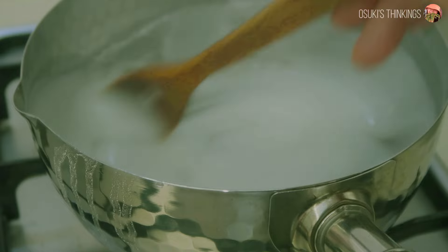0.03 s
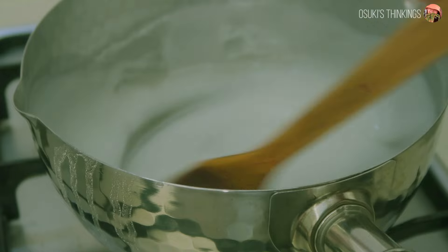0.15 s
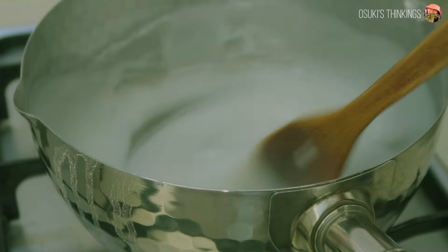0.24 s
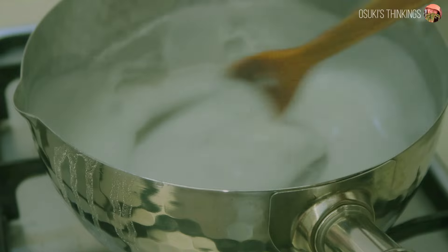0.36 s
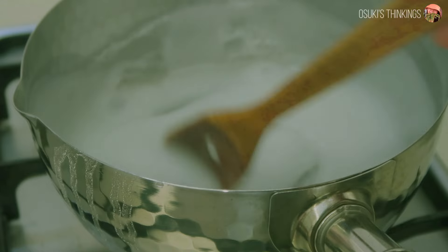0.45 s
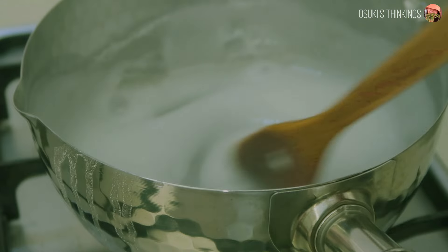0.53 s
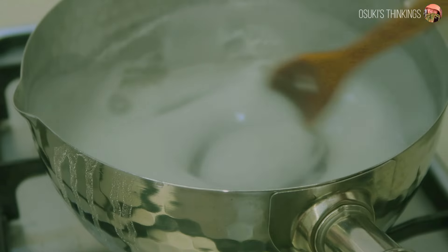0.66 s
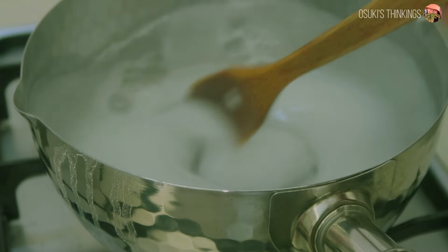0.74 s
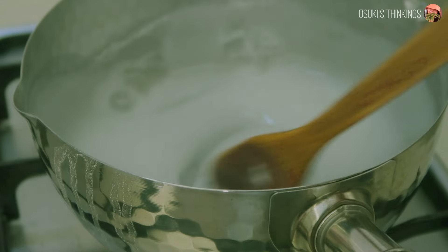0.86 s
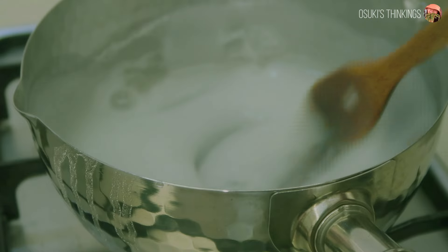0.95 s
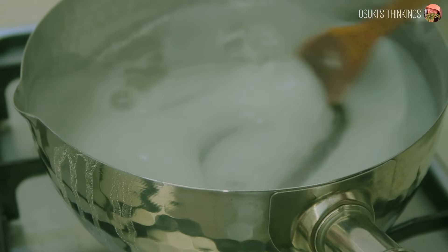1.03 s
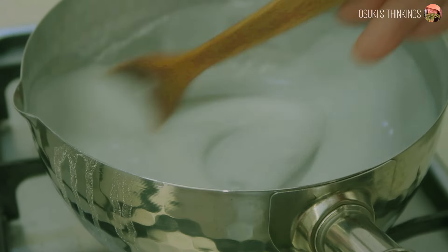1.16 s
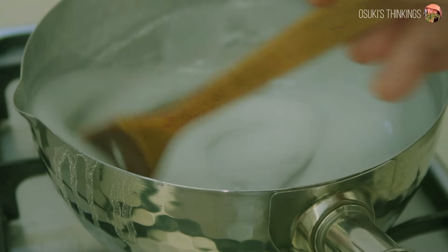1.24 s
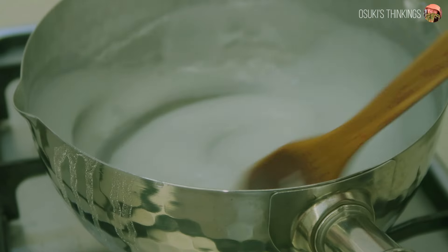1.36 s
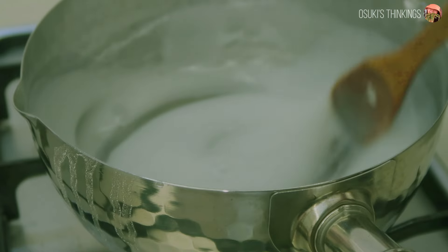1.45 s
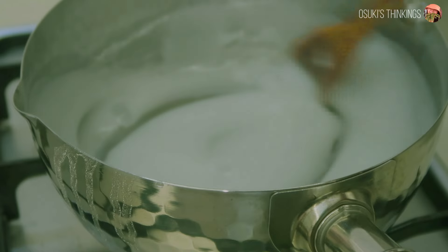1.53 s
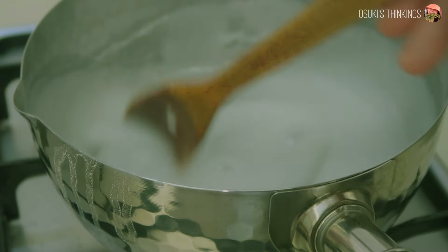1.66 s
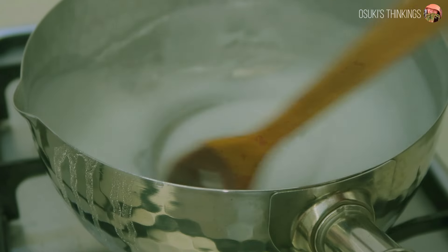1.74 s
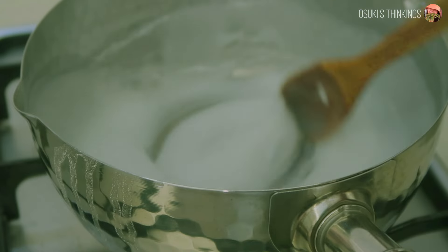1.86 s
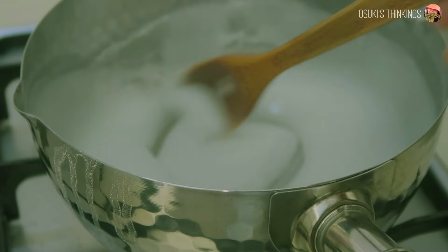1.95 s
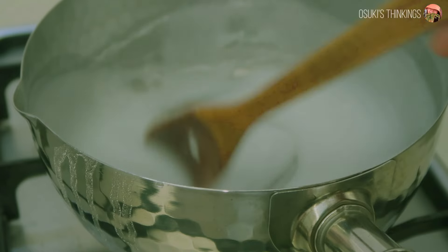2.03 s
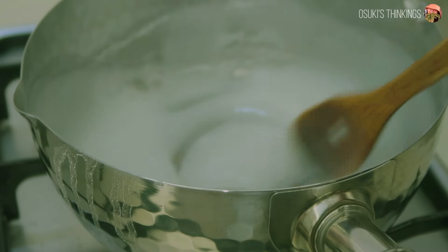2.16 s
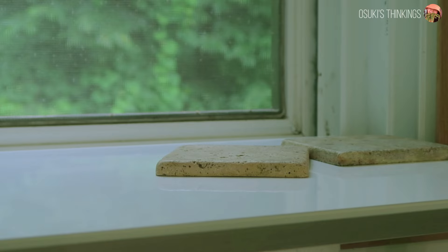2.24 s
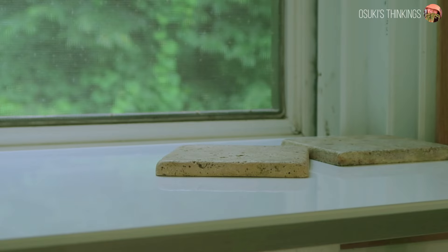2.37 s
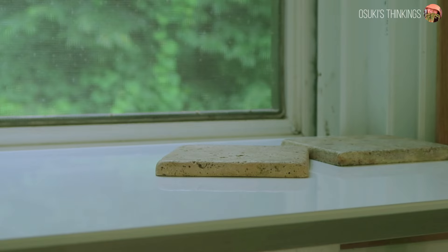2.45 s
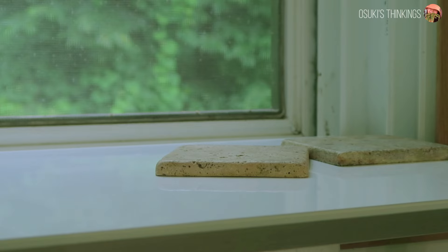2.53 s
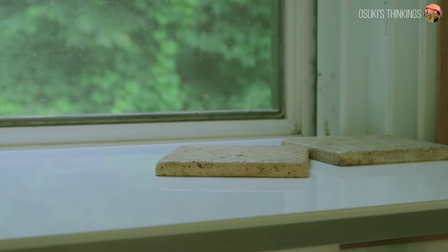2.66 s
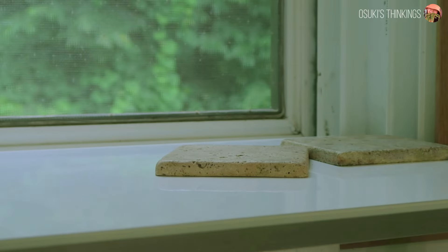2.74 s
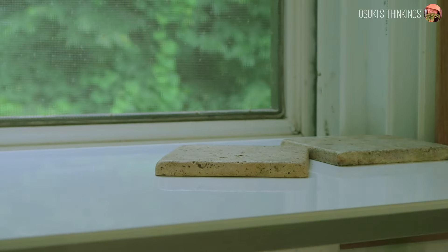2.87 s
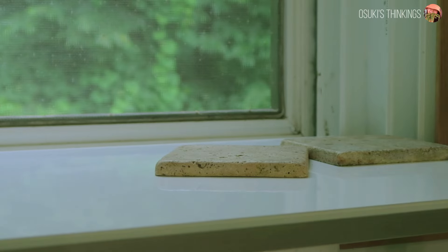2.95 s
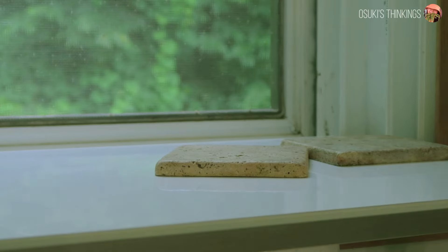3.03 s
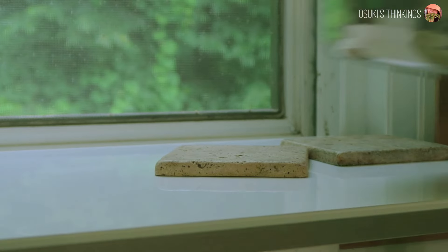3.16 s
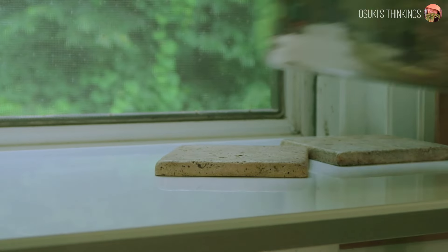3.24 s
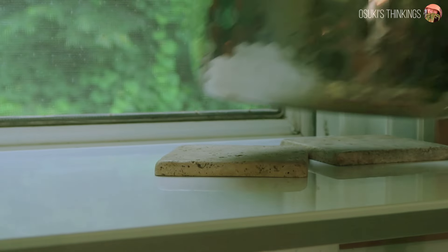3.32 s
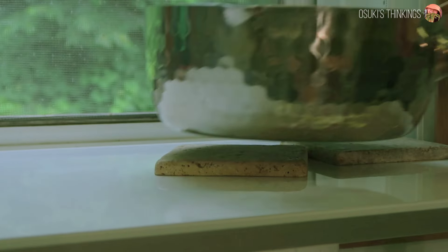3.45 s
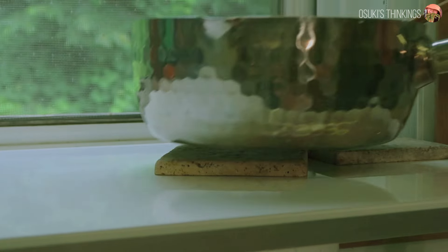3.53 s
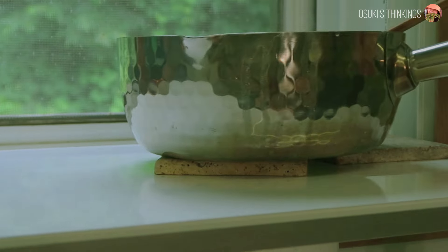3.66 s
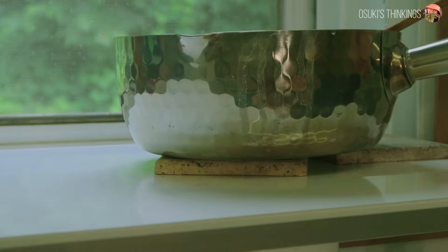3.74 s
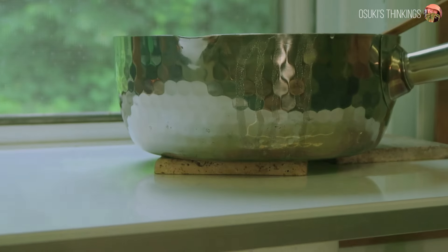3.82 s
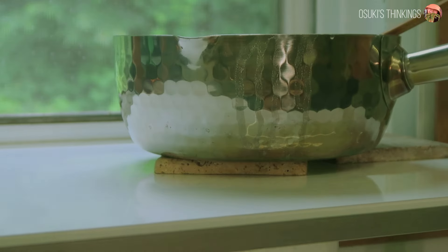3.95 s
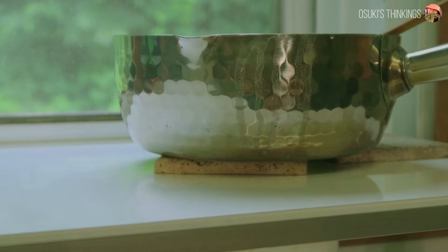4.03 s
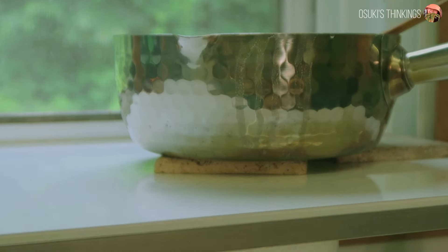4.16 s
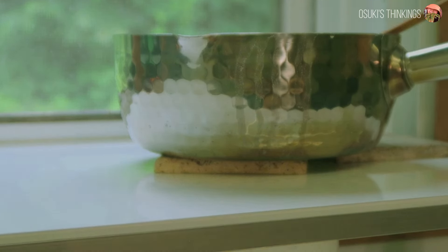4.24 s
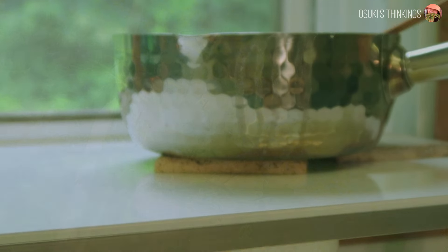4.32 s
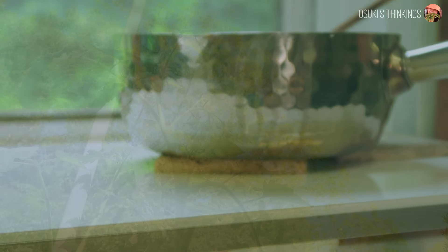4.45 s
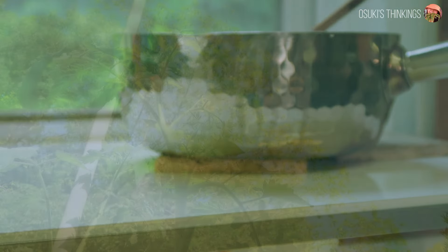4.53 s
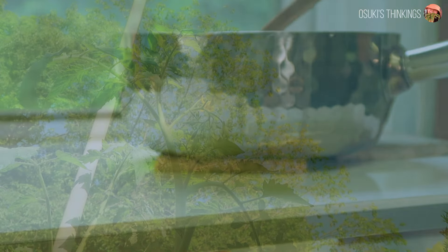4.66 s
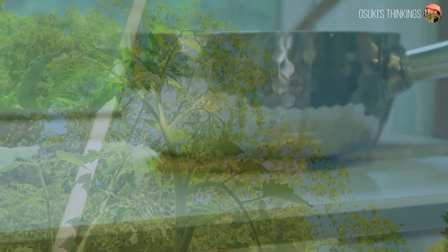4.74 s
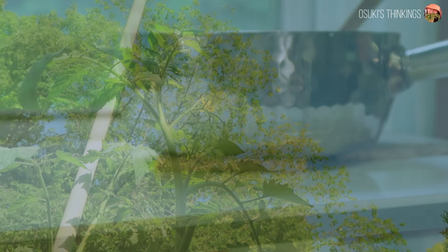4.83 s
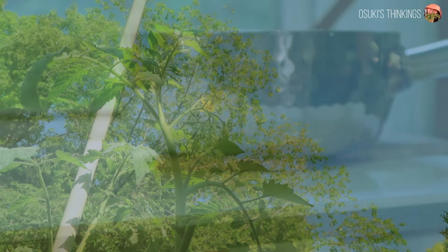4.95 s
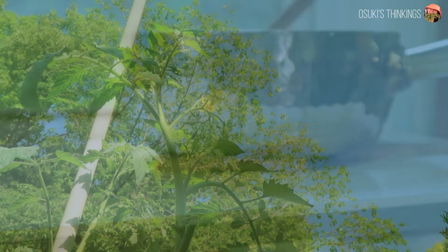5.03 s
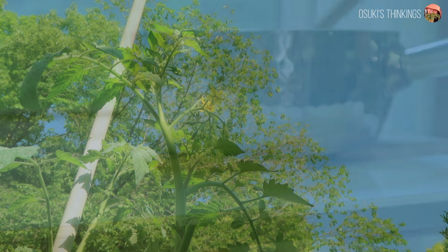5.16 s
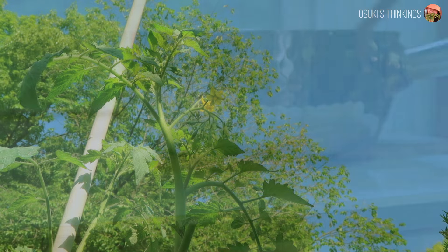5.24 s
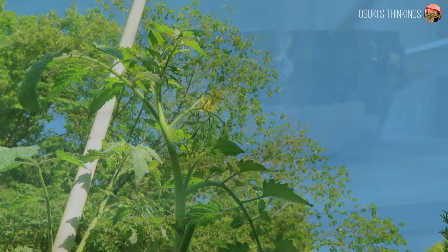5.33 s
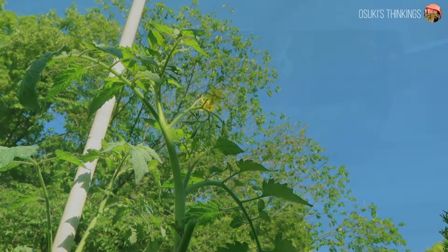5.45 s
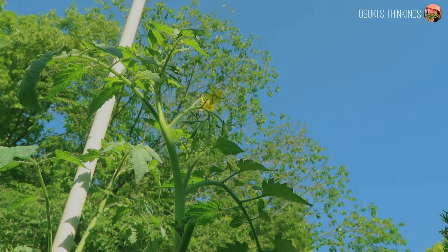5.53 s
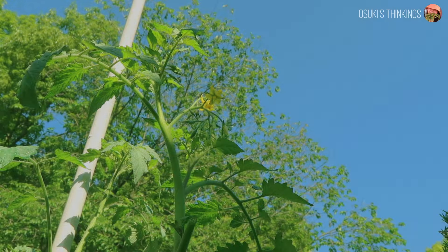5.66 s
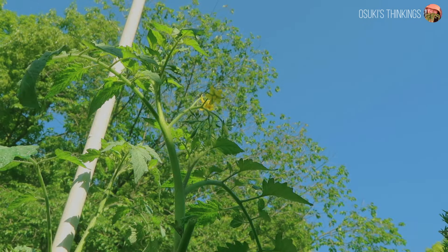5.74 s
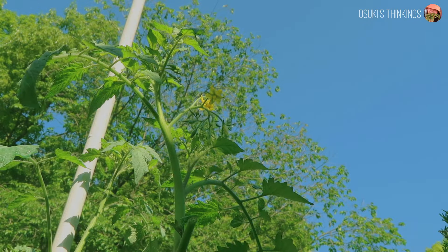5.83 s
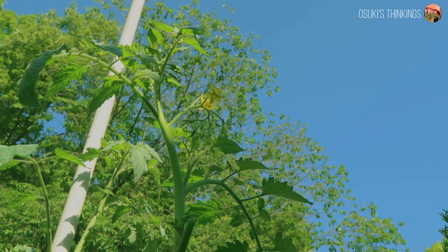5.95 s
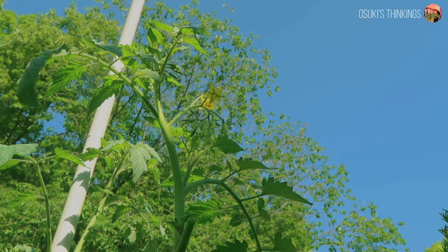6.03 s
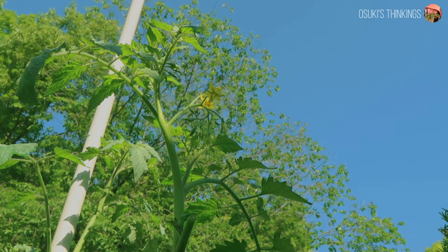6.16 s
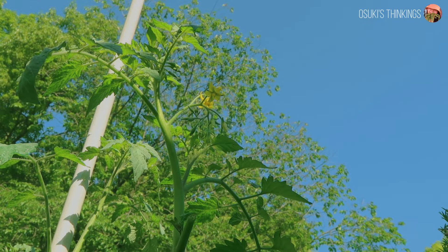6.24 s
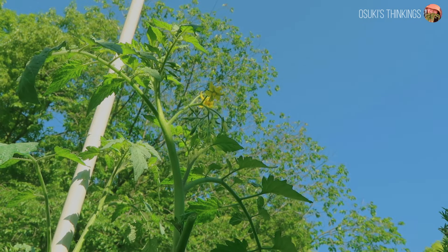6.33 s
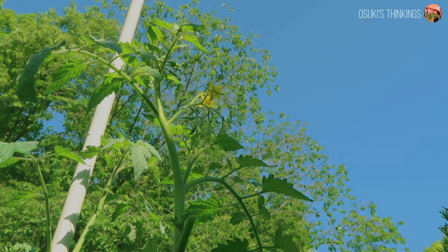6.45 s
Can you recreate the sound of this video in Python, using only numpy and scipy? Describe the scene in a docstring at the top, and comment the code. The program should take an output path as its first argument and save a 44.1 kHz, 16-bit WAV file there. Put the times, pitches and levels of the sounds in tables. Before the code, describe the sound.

Wooden spoon knocks and scrapes in a steel pot of thick paste, a knob clacks, the pot thuds onto stone, then a garden bird chirps.

```python
"""Wooden rubbing and knocking come first: a spoon stirs thick paste in a steel pot in a humming kitchen.
A stove knob clacks, and the pot is set down on a stone coaster, where it rocks to rest.
Then a garden fades in, where a bird gives five arching calls among the trees.
Contacts are bursts of slips that wake decaying modes; paste and air are coloured noise, with small
gliding bubbles in the paste; hum is sines; the bird is a stack of harmonics on a gliding pitch."""
import sys
import numpy as np
from scipy import signal
from scipy.fft import rfft, irfft, next_fast_len
from scipy.io import wavfile

SR = 44100
rng = np.random.default_rng(int(sys.argv[2]) if len(sys.argv) > 2 else 0)


def master(y):
    """Save y as 16-bit WAV."""
    cut = np.clip(np.atleast_2d(y).T, -1, 1)
    pcm = np.round(cut * 32767)  # scale
    wavfile.write(sys.argv[1], SR, pcm.astype(np.int16))


N = 286209
T = np.arange(N) / SR   # time in s
STOVE_END_S, KITCHEN_END_S = 2.236, 4.322
CUTOFF_HZ = 15800
GLIDE_RUB_DB = -48   # rubbing between the strokes

# spoon on the pot wall, levels relative: start_s, ring_db, thud_db, click_db, slide_s
SPOON_KNOCKS = [(.039, -21.5, -31.5, -66, 0.0026), (.128, -5, -17, -17.5, 0.00021),
                (.168, -14, -29, -37, 0.014), (0.3689, -23.5, -22.5, -48, 0.0018),
                (.655, -19.5, -30.5, -34.5, 0.0064), (.8765, -14.5, -40, -43, .00066),
                (1.028, -11, -25, -32, 0.0039), (1.089, -33, -29.5, -24.5, 0.0032),
                (1.1265, -15.5, -48, -33, 0.0036), (1.1834, -14, -38, -27.5, 0.0022),
                (1.245, -11, -38, -26, .0021), (1.259, -9.5, -30, -24, 0.0046),
                (1.291, -18, -28, -46, 0.0071), (1.444, -21, -47, -41, .003),
                (1.521, -19, -24.5, -36, 0.00075), (1.6595, -15.5, -58, -26, 0.0007),
                (1.747, -16, -47, -24.5, 0.012), (1.797, -19, -48, -25.5, .0044),
                (1.934, -23, -22, -29.5, 0.0019), (2.107, -27, -39, -37, .0013)]
# stereo width of near sounds: frequency_hz, side_minus_mid_db
NEAR_WIDTH = [(60, -28.5), (250, -25), (500, -20), (1000, -23), (2000, -14), (4000, -14), (8000, -2),
              (15000, -1)]
# stereo width of indoor sounds: frequency_hz, side_minus_mid_db
INDOOR_WIDTH = [(60, -18), (110, -16), (200, -6.5), (380, -3), (700, -5), (1290, -4), (2380, -3), (4400, 0),
                (8120, -0.5), (15000, 6)]
# stereo width of the garden: frequency_hz, side_minus_mid_db
GARDEN_WIDTH = [(60, -26), (110, -15), (200, -7), (380, -2), (700, 0), (1290, -0.5), (2380, -4),
                (4400, -5.5), (8120, -5.5), (15000, 9.5)]


def amp(db):
    """Decibels to gain."""
    return 10 ** (np.asarray(db) / 20)


def unit(x):
    """Scale to rms 1."""
    return x / np.sqrt(np.mean(x ** 2) + 1e-20)


def at_hz(points, hz):
    """Read a table on a log-frequency axis."""
    table_hz, value = np.transpose(points)
    return np.interp(np.log(np.maximum(hz, 1)), np.log(table_hz), value)


def colour(x, spectrum):
    """Give x a spectrum, with steep skirts beyond its ends; rms 1."""
    size = next_fast_len(x.shape[-1])
    hz = np.arange(size // 2 + 1) * SR / size
    low_skirt, high_skirt = hz / spectrum[0][0], spectrum[-1][0] / (hz + 1)
    skirts = np.minimum(1, np.minimum(low_skirt, high_skirt)) ** 4
    return unit(irfft(rfft(x, size) * amp(at_hz(spectrum, hz)) * skirts, size)[..., :x.shape[-1]])


def stereo_noise(spectrum, width, size=N):
    """Coloured noise whose left-right difference follows a width table; rms 1."""
    mid, side = rng.standard_normal((2, size))
    hz = np.arange(size // 2 + 1) * SR / size
    side = irfft(rfft(side) * amp(at_hz(width, hz)), size)
    return colour(np.array([mid + side, mid - side]), spectrum)


def add(out, start_s, sound):
    """Mix a sound in at its start time."""
    i = max(round(start_s * SR), 0)
    out[..., i:i + sound.shape[-1]] += sound[..., :N - i]


def modes_ring(modes, t, scatter_db):
    """Decaying sines of alternating sign, with new random strengths for every blow."""
    ringing = 0
    for k, (hz, db, t60) in enumerate(modes):
        decay = amp(db + scatter_db * rng.normal() - 60 * t / t60)
        ringing = ringing + decay * np.sin(2 * np.pi * hz * t) * (-1) ** k
    return ringing


def softened(modes, db_per_octave):
    """A soft contact wakes the high modes less."""
    return [(hz, db - db_per_octave * np.log2(hz / modes[0][0]), t60) for hz, db, t60 in modes]


def detuned(modes, spread):
    """Every contact point loads the body differently and shifts its modes a little."""
    return [(hz * (1 + spread * rng.normal()), db, t60) for hz, db, t60 in modes]


def grains(per_s, spread_db, size=N):
    """Random slips of either sign and uneven size."""
    slips = (rng.random(size) < per_s / SR) * rng.choice([-1, 1], size)
    return slips * amp(spread_db * np.minimum(rng.exponential(1, size), 4))


def reverb(x, t60s, width, gap_s):
    """Diffuse reflections that build up after a gap and die octave by octave; unit gain."""
    t, tail = T[:SR], 0
    noise = stereo_noise([(30, 0), (18000, 0.0065)], width, size=SR)
    for hz in 62.5 * 2 ** np.arange(9):
        edges_hz = [hz / np.sqrt(2), min(hz * np.sqrt(2), .45 * SR)]
        band = signal.butter(2, edges_hz, "band", fs=SR, output="sos")
        tail = tail + signal.sosfilt(band, noise) * amp(-60 * t / at_hz(t60s, hz))
    tail = tail * np.clip(t / gap_s - 1, 0, 1)
    return signal.fftconvolve(x, unit(tail) / np.sqrt(SR), axes=-1)[:, :N]


def blows(rows, modes, clatter, split_hz, ring_gain_db, clatter_db, clatter_t60, thud_gain_db,
          click_gain_db, crack_t60, snap, slide_share, scatter_db):
    """A push wakes the deep modes; with a run of slips it wakes bright modes, a dense clatter and a crack."""
    # first instant of a contact: frequency_hz, relative_density_db
    crack_spectrum = [(1500, -7), (2500, 3), (3900, 4), (5200, -4.5), (6500, -6), (8500, -10), (12500, -18),
                      (16000, -37)]
    out, t = np.zeros((2, N)), T[:SR // 3]
    deep = [m for m in modes if m[0] < split_hz]
    bright = [m for m in modes if m[0] >= split_hz]
    ends = np.clip((t[-1] - t) / .05 - 1, 0, 1)
    swell = np.minimum(t / 0.00099, 1) ** 2   # the heavy body gets moving just after the crack
    spike = np.exp(-t / .00009) * np.cos(2 * np.pi * 2500 * t)
    for start_s, ring_db, thud_db, click_db, slide_s in rows:
        # the longer the slide, the more slips follow the first push
        force = slide_share * grains(5000, 1.0, size=len(t)) * np.exp(-t / max(slide_s, .0002))
        force[0] = 1
        dull = 0.27 * (ring_db - click_db - 14.5)   # contacts with little click are the soft ones
        ring = modes_ring(detuned(softened(bright, dull), 0.01), t, scatter_db)
        thud = modes_ring(detuned(deep, 0.033), t, scatter_db)
        dense = stereo_noise(clatter, NEAR_WIDTH, size=len(t)) * amp(clatter_db - 60 * t / clatter_t60)
        crack = stereo_noise(crack_spectrum, NEAR_WIDTH, size=len(t)) * amp(-60 * t / crack_t60)
        crack = crack + snap * spike   # the first touch is one sharp spike
        body = (ring / np.abs(ring).max() + dense) * swell
        sound = amp(ring_db + ring_gain_db) * body + amp(click_db + click_gain_db) * crack
        sound = signal.fftconvolve(sound, force[None] / np.linalg.norm(force), axes=-1)[:, :len(t)]
        thud = amp(thud_db + thud_gain_db) * swell * thud / np.abs(thud).max()
        add(out, start_s, ends * (sound + thud))
    return out


def stroke_levels():
    """Each stroke bites quickly, eases while it lasts and lets go; gains of rub, slosh and hiss."""
    # spoon strokes through the paste, levels relative: start_s, length_s, rub_db, slosh_db, wet_hiss_db
    strokes = [(0.125, 0.065, -27.5, -24.5, -50), (0.387, 0.052, -32, -28.5, -42.5),
               (0.564, 0.046, -34.5, -29.5, -43), (.70, 0.12, -33, -37, -68),
               (0.898, 0.038, -28.5, -35, -44.5), (1.035, 0.055, -30.5, -31, -46),
               (1.262, 0.034, -26, -25.5, -44), (1.538, 0.047, -32.5, -32.5, -49.5),
               (1.783, .025, -24.5, -33.5, -45), (1.932, 0.052, -27, -35, -41.5),
               (2.136, 0.031, -31, -42, -45), (2.267, 0.018, -43, -35, -72)]
    attack_s, sag_db_per_s, release_s = 0.014, 65, 0.024
    glide_db = [[GLIDE_RUB_DB], [-39.5], [-56]]   # the spoon keeps moving between strokes
    power = amp(glide_db) ** 2 * np.ones(N)
    for start_s, length_s, *levels_db in strokes:
        t = T - start_s
        push = np.exp(np.minimum(t, 0) / attack_s - np.maximum(t - length_s, 0) / release_s)
        push = push * amp(-sag_db_per_s * np.clip(t, 0, length_s))
        power = power + (amp(levels_db)[:, None] * push) ** 2
    return np.sqrt(power)


def squelches(low_hz=560, high_hz=1400, cycles=9.1, glide=0.061, count=600, span_s=2.3):
    """Air pockets open and close behind the spoon; each rings briefly and slides in pitch; rms 1."""
    out, t = np.zeros(N), T[:SR // 20]
    for when, length, depth, bend in rng.random((count, 4)):
        hz = low_hz * (high_hz / low_hz) ** ((length + depth) / 2)
        age = t * hz / cycles
        sliding_hz = hz * (1 + glide * (2 * bend - .6) * np.minimum(age, 4))
        phase = 2 * np.pi * np.cumsum(sliding_hz) / SR
        add(out, when * span_s, np.sqrt(age) * np.exp(-age) * np.sin(phase))
    return out / np.std(out[:int(span_s * SR)])


def lead_touches(lead_s=.01, slide_s=0.0047):
    """The spoon squeezes out the paste and touches softly just before each knock."""
    return [(start_s - lead_s, ring_db - 8, thud_db - 11.5, click_db - 11, slide_s)
            for start_s, ring_db, thud_db, click_db, _ in SPOON_KNOCKS]


def grazes(per_s=28, follow_share=0.46, spread_db=4.5, slide_s=0.0018):
    """The spoon brushes the wall at uneven moments, harder during a stroke; rows like those of the knocks."""
    draws = rng.random((100, 2))
    rub_db = 20 * np.log10(stroke_levels()[0] / amp(GLIDE_RUB_DB))
    times_s = (np.arange(len(draws)) + draws[:, 0]) / per_s
    # the touches follow a share of the rubbing's swing in dB
    levels_db = follow_share * np.interp(times_s, T, rub_db) - 2 * spread_db * draws[:, 1]
    return [(start_s, db - 29, db - 48, db - 45, slide_s)
            for start_s, db in zip(times_s, levels_db) if start_s < STOVE_END_S]


def stirring(rub_db=-6.5, wall_db=-10.0, squelch_db=-5.0, slosh_db=-2.5, hiss_db=-3.0):
    """The spoon drags and knocks on the wall, shoves the paste about and tears its wet skin."""
    # spectra of paste, rubbing and wet skin: frequency_hz, relative_density_db
    slosh_spectrum = [(35, -35), (60, -11.5), (124, 0), (156, -3.5), (189, -15), (254, -1.5), (360, -14.5),
                      (387, -26), (420, -6.5), (550, -31), (920, -120)]
    rub_spectrum = [(180, -61), (300, -16), (381, -13), (517, 6), (606, -2), (841, 1), (1100, -24),
                    (1340, -22), (1820, -14.5), (2500, -10), (3350, -18), (3590, -39), (4500, -48),
                    (5850, -57), (9900, -120)]
    hiss_spectrum = [(1470, -30), (2500, -4.5), (4780, -3), (6200, -3), (6640, -5), (12100, -12),
                     (15500, -23)]
    # pot wall damped by the paste: frequency_hz, relative_db, t60_s
    wall_modes = [(121, -14, 0.25), (243, -5.5, 0.077), (397, -5.5, 0.034), (507, -0.5, 0.045),
                  (733, -4, 0.088), (840, -0.5, 0.17), (1007, 0, 0.058), (1312, 0, 0.046),
                  (1466, 2.5, 0.057), (1614, -2, 0.055), (1940, -1.5, 0.036), (2182, -5, 0.062),
                  (2500, 0.5, 0.034), (2826, -10.5, 0.12), (3710, -3, 0.019), (3870, -55, 0.023)]
    # dense short modes of spoon and pot: frequency_hz, relative_density_db
    wall_clatter = [(150, -9), (400, 6), (900, 2), (1500, 14), (2500, -24), (4500, -22.5), (7000, -39)]
    rub, slosh, hiss = stroke_levels()
    slips = unit(grains(2500, 5)) * rub
    ringing = unit(signal.fftconvolve(slips, modes_ring(wall_modes[4:10], T[:SR // 4], 0))[:N])
    rubbing = np.std(slips) * (amp(rub_db) * colour(slips, rub_spectrum) + amp(wall_db) * ringing)
    sloshing = slosh * amp(slosh_db) * stereo_noise(slosh_spectrum, NEAR_WIDTH)
    squelching = rub * amp(squelch_db) * squelches()
    # one crackle shared by both ears, and a weaker one for each
    crackle = grains(2600, 2.7) + 0.34 * np.array([grains(3000, 1.3), grains(3000, 4.6)])
    wet = hiss * amp(hiss_db) * colour(crackle, hiss_spectrum)
    knocks = blows(SPOON_KNOCKS + lead_touches() + grazes(), wall_modes, wall_clatter, split_hz=600,
                   ring_gain_db=-6.0, clatter_db=-5.0, clatter_t60=0.026, thud_gain_db=2.0,
                   click_gain_db=-1.5, crack_t60=0.033, snap=2.1, slide_share=0.17, scatter_db=5.0)
    stop = np.clip((2.33 - T) / 0.019, 0, 1)
    return (rubbing + sloshing + squelching + wet) * stop + knocks


def kitchen_air():
    """Steady coloured noise, first by the stove and then by the window."""
    # air by the stove and by the window: frequency_hz, relative_density_db
    stove_spectrum = [(15, -31), (25, -3), (130, 5), (590, -7.5), (861, -12), (1220, -14.5), (1480, -10),
                      (1780, -14), (12200, -33.5), (14700, -39), (15900, -77)]
    window_spectrum = [(12, -53), (20, -18.5), (59, 0.5), (92, -6.5), (175, -4.5), (207, -9.5), (298, -7),
                       (393, -10), (505, -13), (881, -18), (1870, -24), (4680, -31.5), (6540, -37),
                       (13100, -46.5), (15500, -68)]
    at_stove = np.clip((STOVE_END_S - T) / 0.0034, 0, 1)
    stove_air = amp(-40) * stereo_noise(stove_spectrum, INDOOR_WIDTH)
    window_air = amp(-40) * stereo_noise(window_spectrum, INDOOR_WIDTH)
    return at_stove * stove_air + (1 - at_stove) * window_air


def appliance(tick_hz=4800, tick_s=0.00036, tick_db=-42.5, hum_db=-1.0):
    """Steady sines hum; a faint electric tick repeats, sometimes doubled one mains cycle later."""
    # appliance hum: frequency_hz, relative_db
    hum_tones = [(59.2, -49), (177.6, -51), (296.1, -57), (382.2, -57), (414.5, -60.5), (882.9, -60)]
    from_s, period_s, mains_hz, double_share, spread_db = 2.4889, .06672, 60, .45, 3.5
    out = np.zeros(N)
    t = T[:SR // 100] - .0022   # time from the middle of the tick
    tick = np.exp(-(t / tick_s) ** 2) * np.cos(2 * np.pi * tick_hz * t)
    for start_s in np.arange(from_s, KITCHEN_END_S, period_s):
        first, second = amp(tick_db + spread_db * rng.standard_normal(2))
        add(out, start_s, first * tick)
        add(out, start_s + 1 / mains_hz, second * tick * (rng.random() < double_share))
    for hz, db in hum_tones:
        out += np.sqrt(2) * amp(db + hum_db) * np.sin(2 * np.pi * (hz * T + rng.random()))
    return out


def knob(t60=0.3, ring_db=-2.0, rough_db=1.5):
    """A quick run of clacks that rattle on unevenly in the stove top."""
    # clacks of the stove knob: start_s, level_db
    clacks = [(2.333, -34), (2.346, -28), (2.354, -24.5), (2.365, -29), (2.408, -49)]
    # rattle of the stove top: frequency_hz, relative_density_db
    body_spectrum = [(59, -39), (100, 2), (171, 1), (270, -10), (568, 2.5), (698, -11), (1150, -6.5),
                     (1410, -13.5), (1700, -6), (2620, -19), (2910, -11), (3890, -24.5), (7690, -23),
                     (11400, -38), (14000, -35)]
    # ringing of the stove top: frequency_hz, relative_db, t60_s
    knob_modes = [(558, -11.5, 0.57), (1700, -10.5, 0.39), (2320, -8, .15), (2910, -9.5, 0.17),
                  (3324, -10, 0.14), (8000, -6.5, 0.055), (13200, -15, 0.1)]
    out, t = np.zeros((2, N)), T[:SR // 2]
    for start_s, db in clacks:
        uneven = amp(rough_db * colour(rng.standard_normal(len(t)), [(30, 0), (300, 0)]))
        rattle = stereo_noise(body_spectrum, INDOOR_WIDTH, size=len(t)) * uneven * amp(-60 * t / t60)
        ring = amp(ring_db) * modes_ring(knob_modes, t, 3)
        add(out, start_s, amp(db) * (rattle + ring) * np.minimum(t / 0.0021, 1))
    return out


def pot_landing():
    """The pot strikes the coaster and rocks to rest, waking the modes of base, coaster and counter."""
    # pot on the coaster, levels relative: start_s, ring_db, thud_db, click_db, slide_s
    contacts = [(3.7422, 0, -11.5, -14, 0.00044), (3.747, -6, -27, -18, 0.0018),
                (3.7535, -25, -13, -33, 0.0026), (3.7945, -17, -16, -33, 0.0013),
                (3.8668, -12.5, -17, -48, 0.0016), (3.875, -16.5, -17, -53, 0.031),
                (3.9085, -9, -35, -42, 0.0037), (3.9435, -27, -23, -33.5, 0.0093),
                (3.951, -16.5, -26, -43, 0.0038), (3.9654, -21, -22.5, -48, 0.0095)]
    # pot base, coaster and counter: frequency_hz, relative_db, t60_s
    base_modes = [(157, -8, .16), (202, -0.5, 0.12), (259, -7.5, 0.2), (319, -6, 0.24), (367, 1, 0.21),
                  (452, -0.5, 0.16), (527.4, -5.5, 0.27), (600, -16, 0.17), (732, 3.5, 0.11),
                  (809, -3, 0.17), (1004, 6.5, 0.07), (1400, -13, 0.076), (1538, -16.5, 0.031),
                  (1947, -8.5, 0.036), (2370, -20, .05), (2910, -22.5, 0.021), (3460, -17.5, 0.042),
                  (3640, -17, .05), (4010, -18, 0.029)]
    # dense short modes of coaster and counter: frequency_hz, relative_density_db
    base_clatter = [(130, -6.5), (220, 0), (430, -1), (620, -6.5), (920, 4.5), (1300, -3.5), (2000, -10.5),
                    (4000, -32.5), (6000, -41)]
    return blows(contacts, base_modes, base_clatter, split_hz=560, ring_gain_db=-0.5, clatter_db=-7.0,
                 clatter_t60=.11, thud_gain_db=5.5, click_gain_db=4.0, crack_t60=0.019, snap=0.9,
                 slide_share=0.56, scatter_db=5.0)


def garden(bird_pan_db=-0.26, right_lead_s=.00004, trees_db=3.0, echo_s=.045, echo_db=-18.5, full_s=5.68):
    """Distant rumble fades in; the bird sits to the right and its calls scatter back from the trees."""
    # steady garden air: frequency_hz, relative_density_db
    garden_spectrum = [(12, -43), (20, -33), (49, 5), (148, -1.5), (196, -2.5), (282, -5.5), (362, -7),
                       (404, -10), (631, -17), (1770, -23), (3000, -28.5), (3960, -24.5), (4680, -30.5),
                       (13100, -46.5), (15500, -71)]
    # decay of the reflections from the trees: frequency_hz, t60_s
    trees_t60 = [(1000, 0.99), (4000, 0.71), (6500, 0.53), (11000, 0.66)]
    call = bird()
    left = np.interp(T - right_lead_s, T, call)
    calls = np.array([left, call]) * amp([[bird_pan_db], [-bird_pan_db]])
    echo = amp(echo_db) * np.interp(T - echo_s, T, call)
    trees = amp(trees_db) * reverb(calls, trees_t60, GARDEN_WIDTH, gap_s=0.00022)
    air = amp(-35.5) * stereo_noise(garden_spectrum, GARDEN_WIDTH)
    fade = np.clip((T - KITCHEN_END_S) / (full_s - KITCHEN_END_S), 0, 1)
    return fade * (calls + echo + trees + air)


def call_pitch(t, leap_s, arch_s, tail_s, fall_s, knee_hz, top_hz, tail_hz, crest):
    """The pitch leaps to a knee, arches over its top, then drops into a low tail with a small bend."""
    start_hz, low_hz, end_hz = 784, 920, 790
    along = np.clip((t - leap_s) / (arch_s - leap_s), 0, 1)
    leap = np.interp(t, [0, leap_s], [start_hz, knee_hz])
    arch = leap + (top_hz - knee_hz) * np.sin(np.pi / 2 * along / crest)
    along_tail = (t - arch_s - fall_s) / tail_s
    tail = np.interp(along_tail, [.2, .5, .8, 1], [low_hz, tail_hz, tail_hz, end_hz])
    fallen = np.sin(np.pi / 2 * np.clip((t - arch_s) / fall_s, 0, 1)) ** 2
    return arch + fallen * (tail - arch)


def bird(trill_hz=260, fundamental_db=-23.0, jitter=0.012, tail_jitter=0.027, fall_s=0.025):
    """A syrinx tone with a weakened fundamental; the throat lifts whichever harmonics sweep through it."""
    # bird calls: start_s, level_db, leap_s, arch_s, tail_s, knee_hz, top_hz, tail_hz,
    # crest (0-1 along the arch), swell_db (knee to crest), tail_db, arch_odd_db (odd harmonics),
    # rolloff_db (per octave of harmonics), trill_depth_hz
    bird_calls = [(4.46, -18.5, .014, .094, .051, 1570, 1842, 1310, 1, 6, -3.5, 4.5, -3.5, 0.5),
                  (4.743, -19, .03, 0.12, .057, 2443, 3093, 1095, 0.82, .5, -5, -16, -5.5, 201),
                  (5.051, -26, .029, .114, 0.055, 2470, 3180, 1085, 0.86, -0.5, -4.5, -16, -8.5, 207),
                  (5.619, -19.5, .02, 0.091, 0.038, 1750, 2302, 790, .95, 6, -10.5, -12, -7, 0),
                  (5.868, -32, .03, .118, 0.061, 2520, 3223, 1113, 0.81, -1.5, -0.5, -17, -8, 200)]
    # resonances of the throat: frequency_hz, gain_db
    throat = [(800, -35), (1800, -10), (2600, -6.5), (3700, 7.5), (4600, 3.5), (6300, -4.5), (7500, 2),
              (9500, -14), (11000, -2), (12200, -35), (15000, -62)]
    onset_db, fade_db = -10, -4.5   # start against the knee; change along the tail
    low_odd_db = -3.5   # odd harmonics while the pitch is low
    out = np.zeros(N)
    k = np.arange(1, 13)[:, None]   # harmonic numbers
    for (start_s, call_db, leap_s, arch_s, tail_s, knee_hz, top_hz, tail_hz, crest,
         swell_db, tail_db, arch_odd_db, rolloff_db, trill_depth_hz) in bird_calls:
        low_s = arch_s + fall_s
        t = T[:int((low_s + tail_s) * SR)]
        crest_s = leap_s + min(crest, 1) * (arch_s - leap_s)
        db = np.interp(t, [0, leap_s, crest_s, low_s, t[-1]],
                       [onset_db - swell_db, -swell_db, 0, tail_db, tail_db + fade_db])
        odd_db = np.interp(t, [0, leap_s, arch_s, (arch_s + low_s) / 2],
                           [low_odd_db, arch_odd_db, arch_odd_db, low_odd_db])
        depth_hz = np.interp(t, [leap_s, (leap_s + arch_s) / 2, arch_s], [0, trill_depth_hz, 0])
        trill = depth_hz * np.sin(2 * np.pi * trill_hz * t)
        waver = colour(rng.standard_normal(SR // 2), [(20, 1), (200, 7.5), (800, -19)])[:len(t)]
        waver = waver * np.interp(t, [arch_s, low_s], [jitter, tail_jitter])   # the low tail is unsteady
        glide_hz = call_pitch(t, leap_s, arch_s, tail_s, fall_s, knee_hz, top_hz, tail_hz, crest)
        hz = glide_hz * (1 + waver) + trill
        gains_db = at_hz(throat, k * hz) + rolloff_db * np.log2(k)
        gains_db = gains_db + odd_db * (k % 2) + fundamental_db * (k == 1)
        gains = amp(gains_db) * (k * hz < CUTOFF_HZ)
        tone = np.sum(gains * np.sin(2 * np.pi * k * np.cumsum(hz) / SR), axis=0)
        tone = tone / np.sqrt(np.sum(gains ** 2, axis=0) / 2)   # level independent of the harmonic mix
        ends = np.clip(np.minimum(t, t[-1] - t) / 0.0011, 0, 1)
        add(out, start_s, tone * amp(call_db + db) * ends)
    return out


def scene():
    """At the stove, at the window, then outdoors."""
    # decay of the kitchen's reflections: frequency_hz, t60_s
    kitchen_t60 = [(100, 0.56), (500, 0.37), (2000, 0.3), (6000, 0.28), (15000, 0.06)]
    pot = stirring() + pot_landing()
    room = amp(-13.0) * reverb(pot, kitchen_t60, INDOOR_WIDTH, gap_s=0.0029)
    indoors = pot + room + kitchen_air() + appliance() + knob()
    return indoors * np.clip((KITCHEN_END_S - T) / 0.0013, 0, 1) + garden()


def record(dry):
    """The loudest peaks overload; the top is cut."""
    clipped = dry / (1 + dry ** 8) ** (1 / 8)
    low_pass = signal.ellip(10, .1, 80, CUTOFF_HZ, fs=SR, output="sos")
    return signal.sosfilt(low_pass, clipped)


dry = scene()
out = record(dry)
master(out)
```